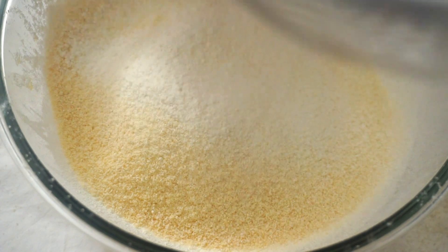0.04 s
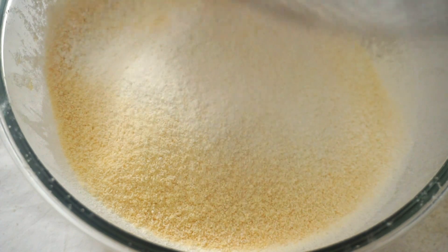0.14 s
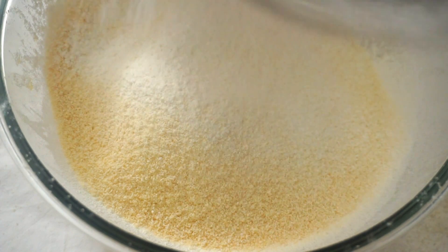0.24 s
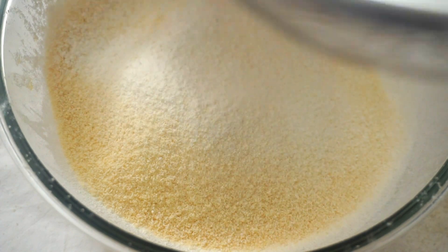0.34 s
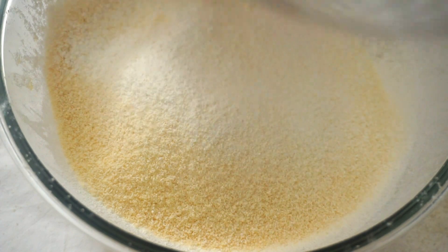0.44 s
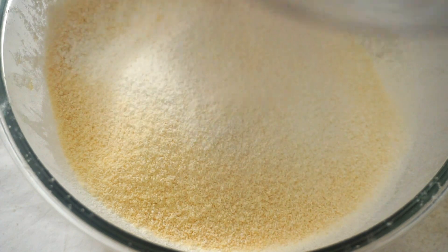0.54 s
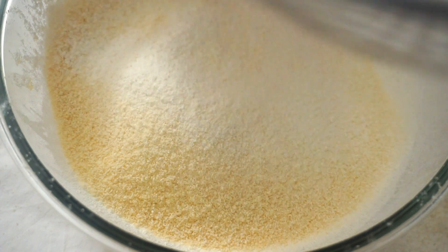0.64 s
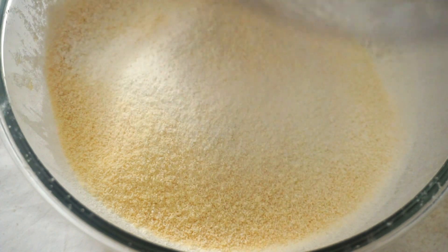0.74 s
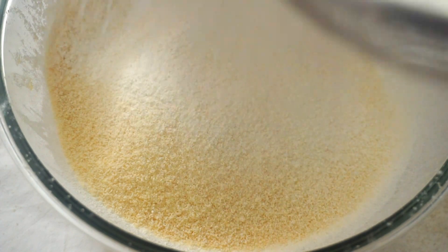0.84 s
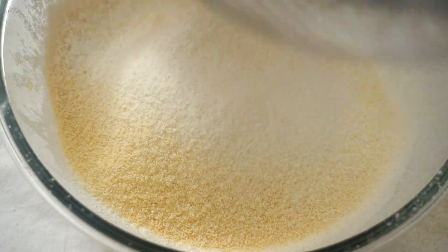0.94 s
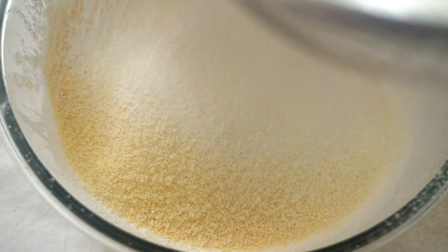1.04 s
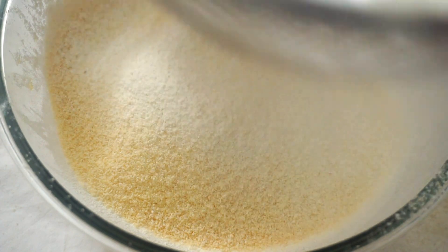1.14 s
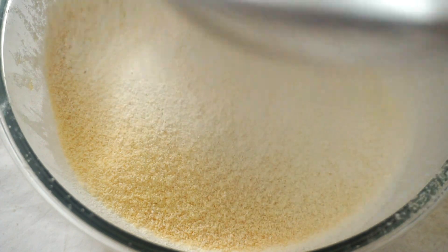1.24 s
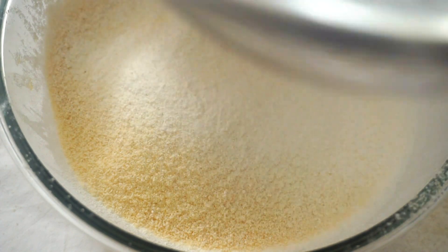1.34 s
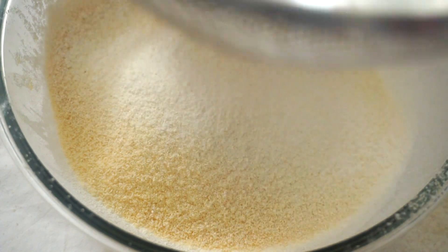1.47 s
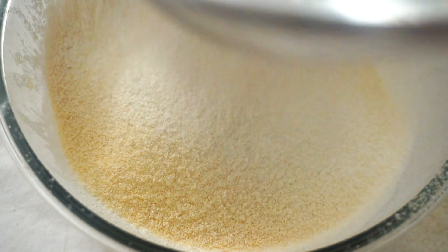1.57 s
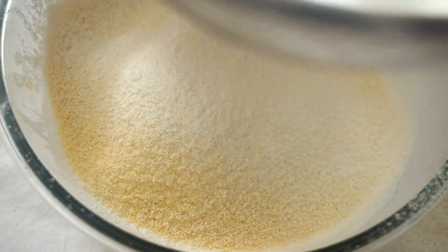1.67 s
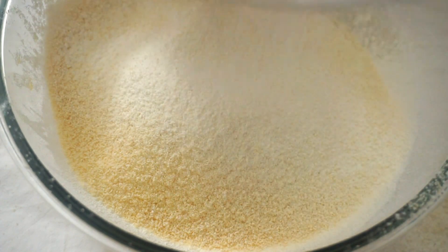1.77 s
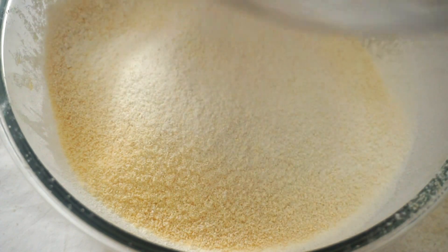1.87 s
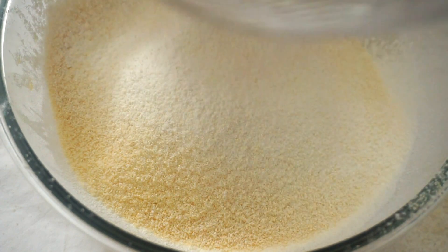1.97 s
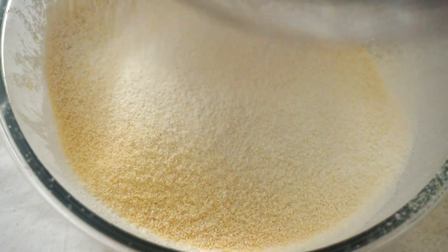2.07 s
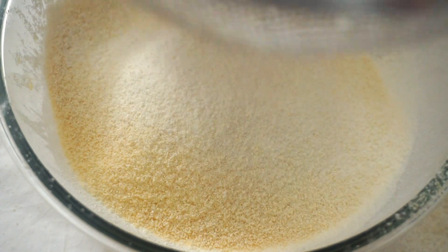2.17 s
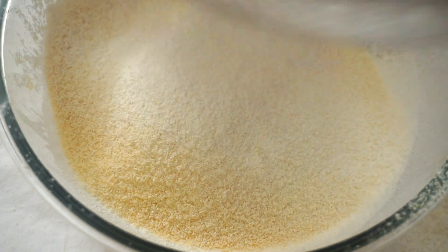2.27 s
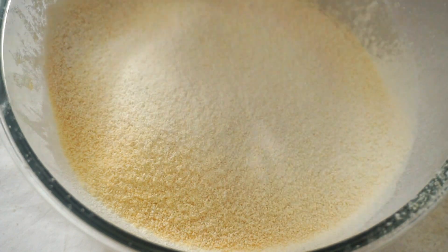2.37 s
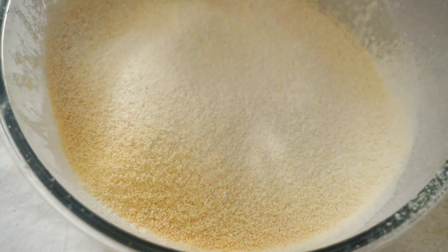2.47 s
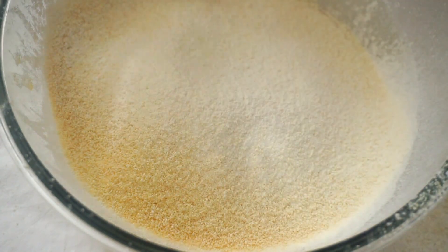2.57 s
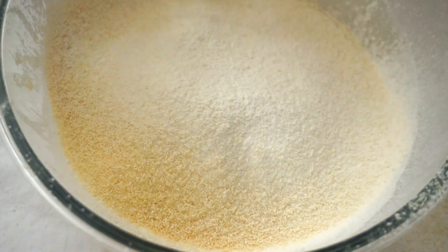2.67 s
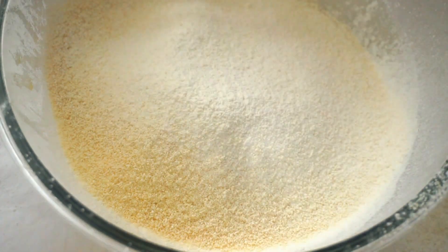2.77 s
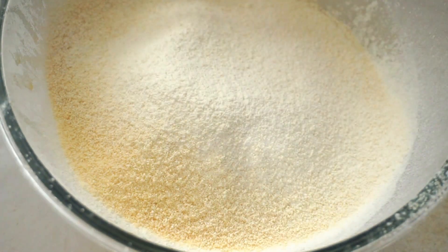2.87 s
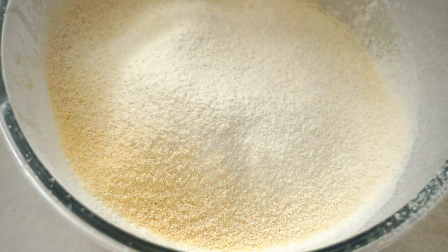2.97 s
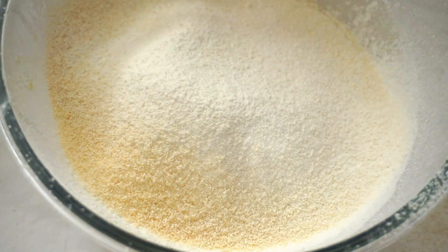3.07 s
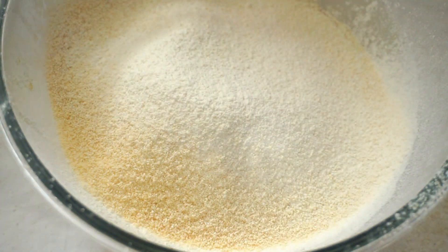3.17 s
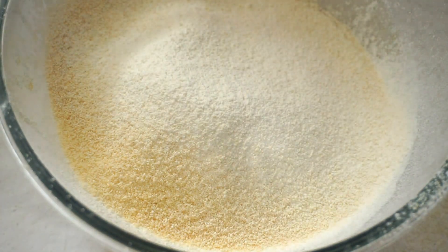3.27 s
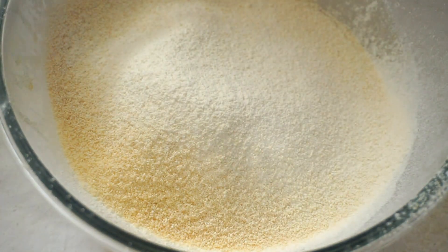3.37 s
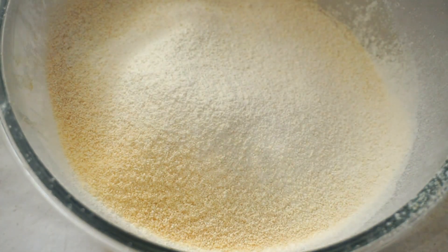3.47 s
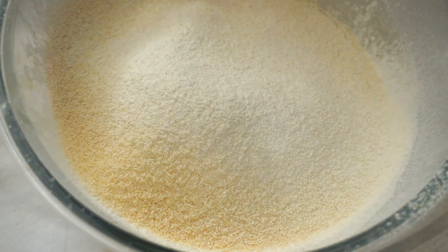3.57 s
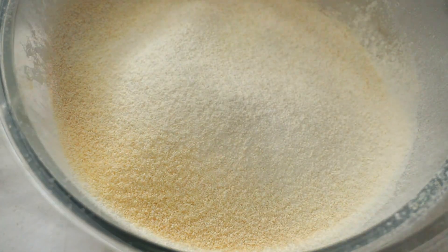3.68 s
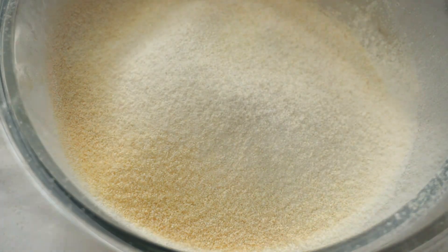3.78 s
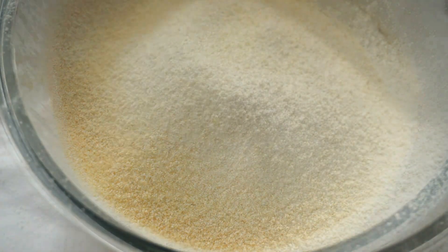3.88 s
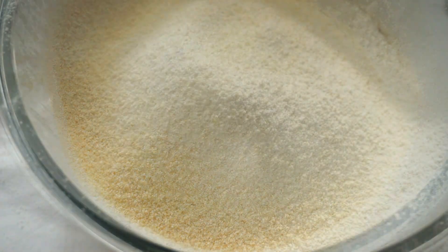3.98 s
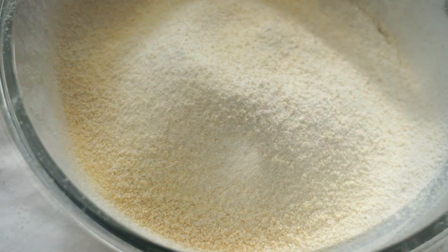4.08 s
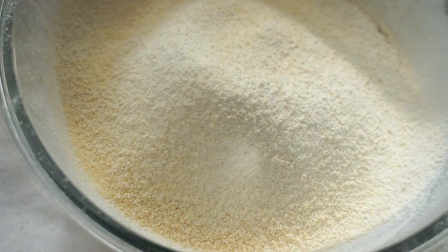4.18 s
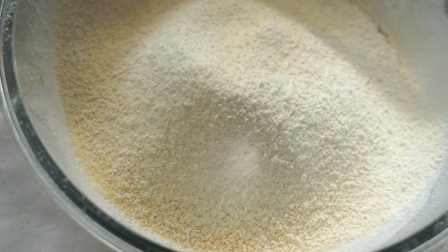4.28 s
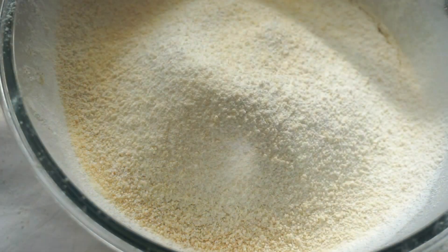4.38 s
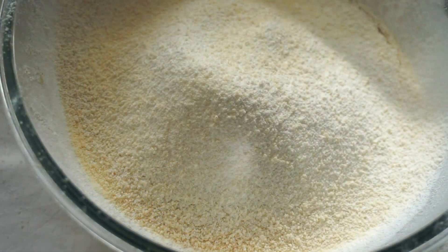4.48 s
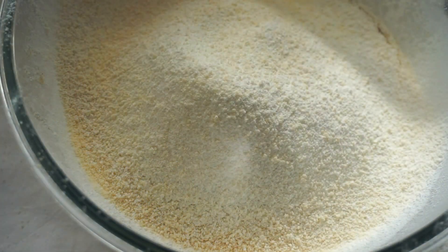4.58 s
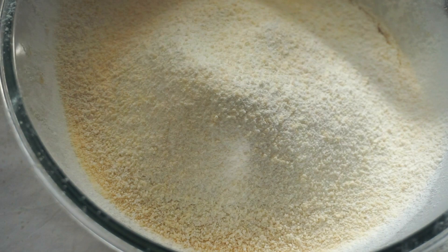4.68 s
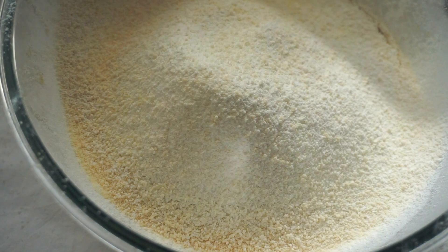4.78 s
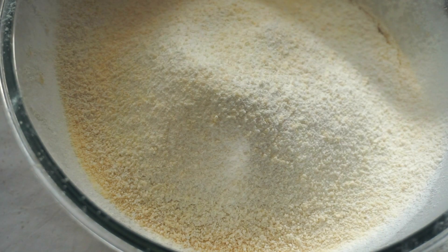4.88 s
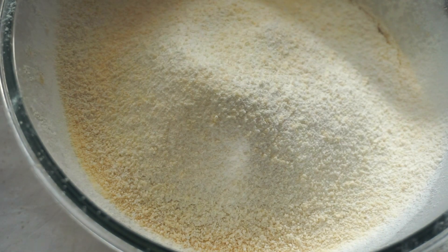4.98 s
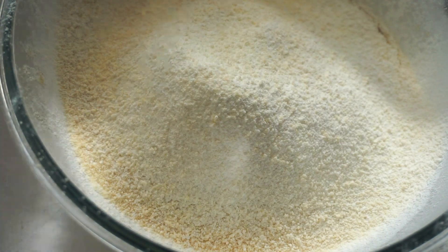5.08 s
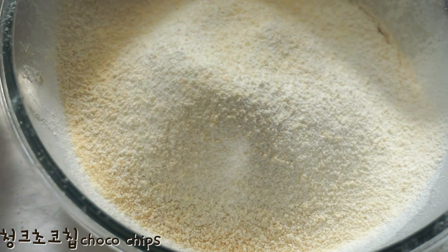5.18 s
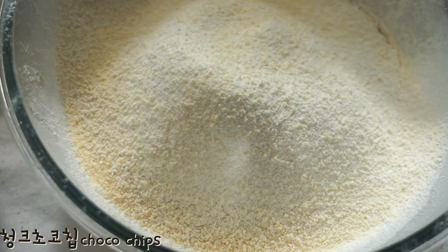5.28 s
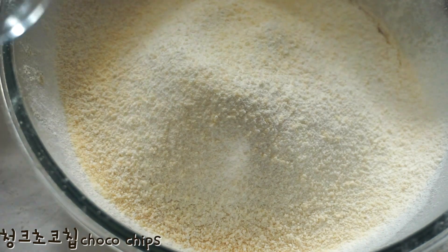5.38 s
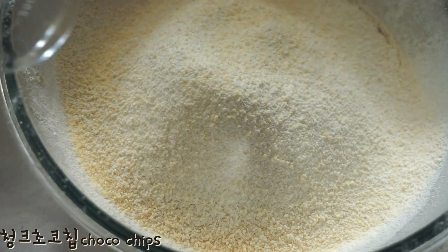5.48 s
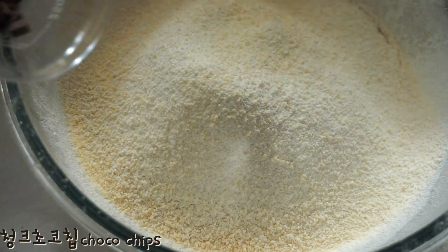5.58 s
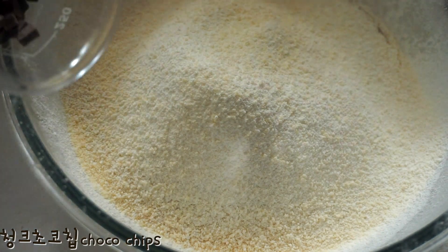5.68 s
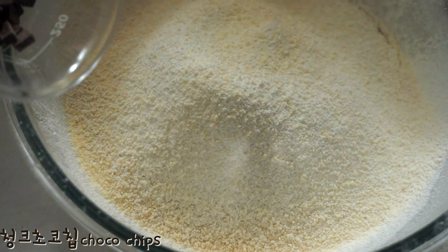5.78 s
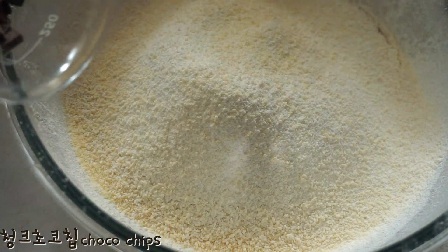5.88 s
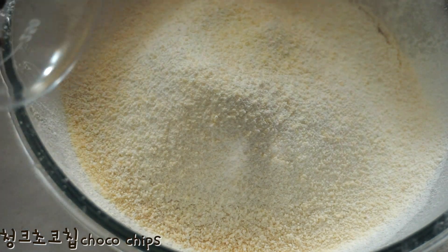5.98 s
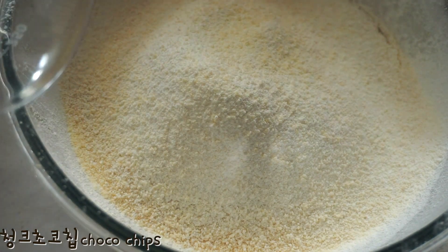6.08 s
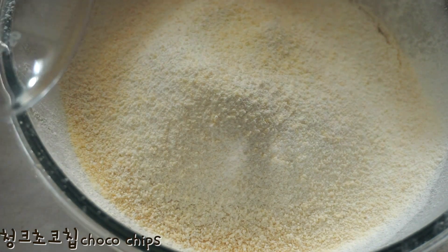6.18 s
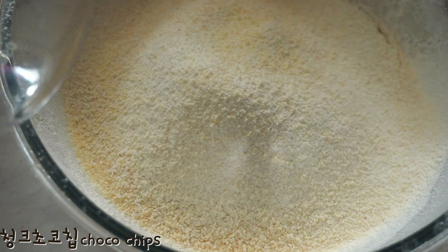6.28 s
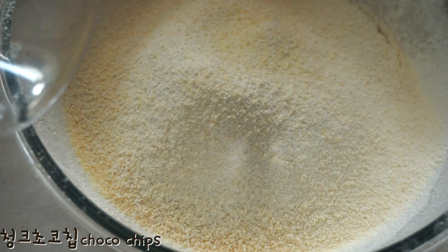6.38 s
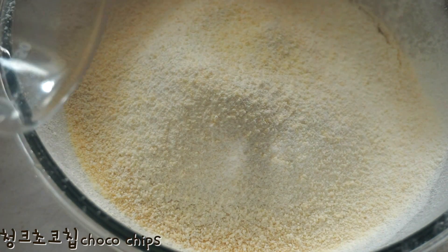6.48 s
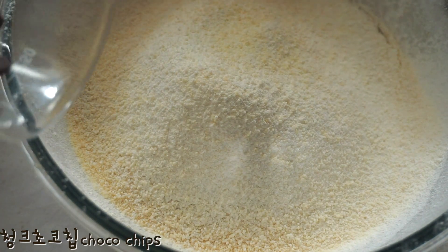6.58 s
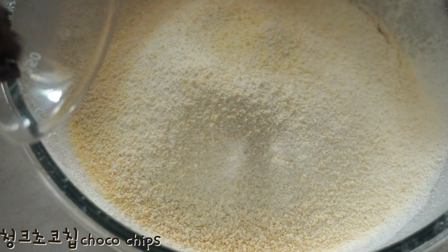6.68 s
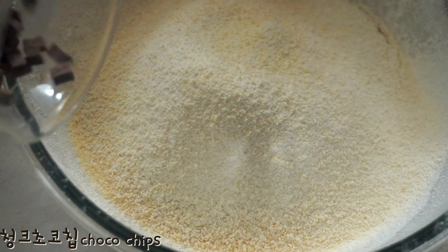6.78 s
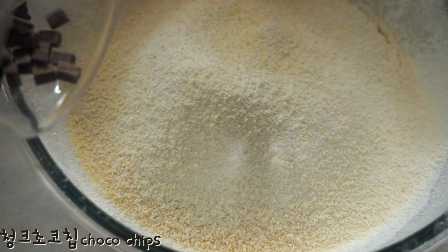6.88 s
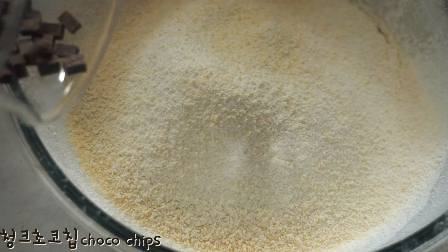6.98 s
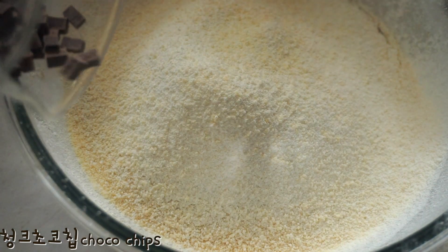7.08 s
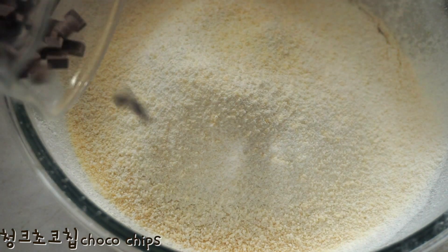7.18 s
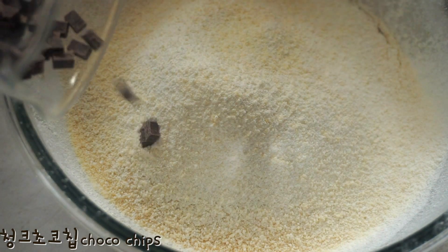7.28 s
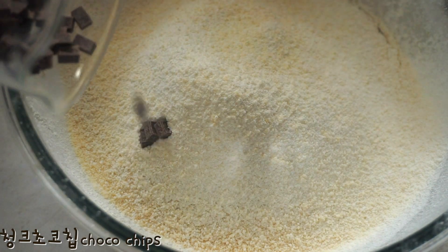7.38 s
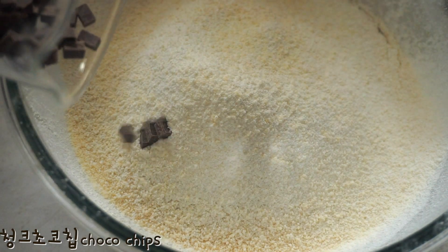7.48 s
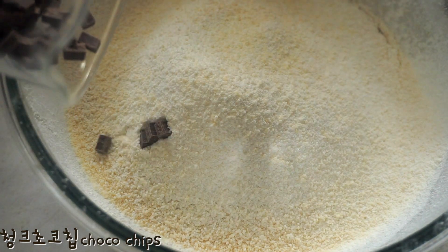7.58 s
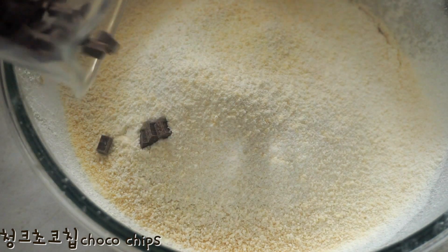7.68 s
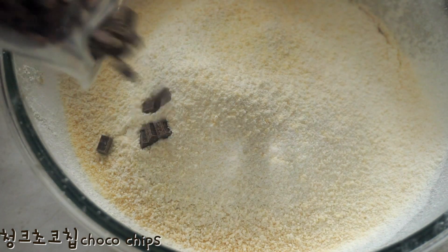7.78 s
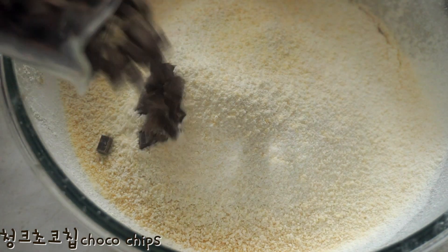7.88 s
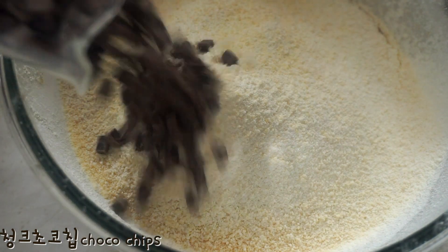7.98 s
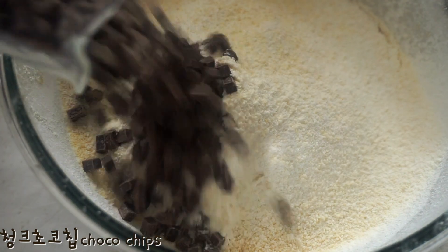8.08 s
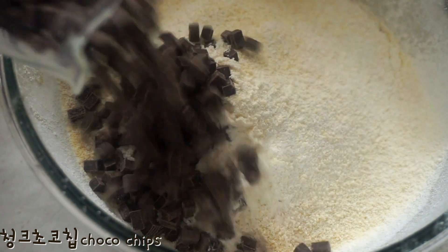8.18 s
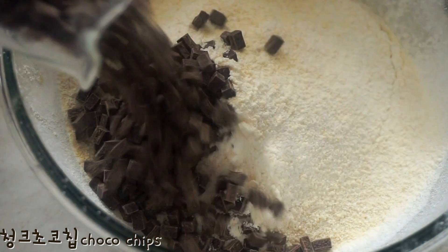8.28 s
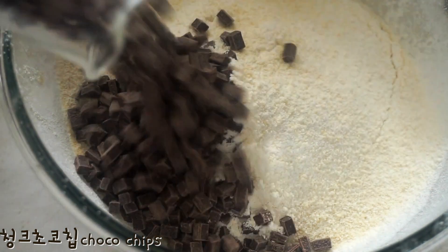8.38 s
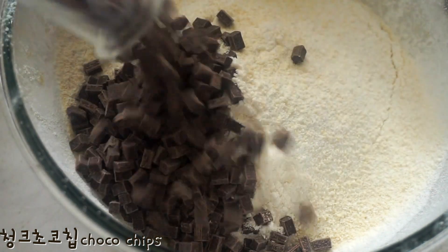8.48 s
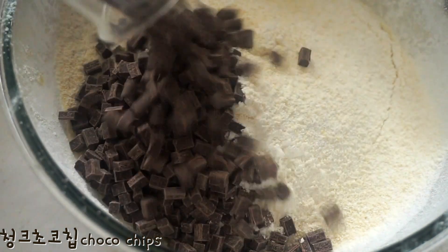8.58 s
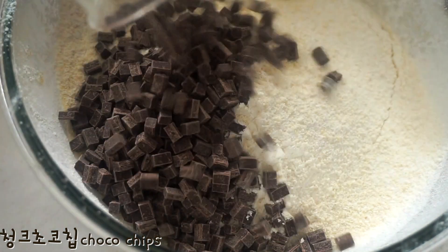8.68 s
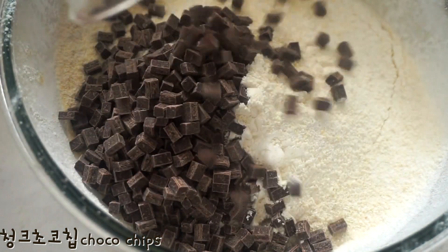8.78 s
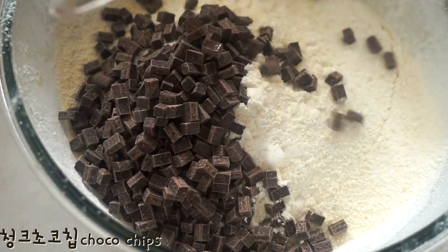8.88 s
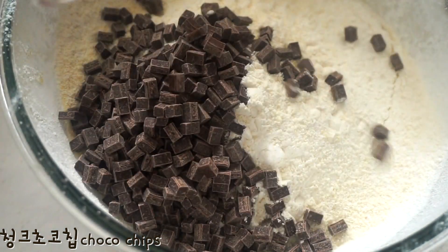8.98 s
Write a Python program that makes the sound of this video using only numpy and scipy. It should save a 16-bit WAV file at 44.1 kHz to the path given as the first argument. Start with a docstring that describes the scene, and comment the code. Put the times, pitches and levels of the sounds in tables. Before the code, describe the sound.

Rhythmic sieve taps with low thuds, a quiet rub of fingers on glass, then hard chunks jingling in a small cup and pattering onto flour.

```python
"""At a worktop, a hand taps a mesh sieve over a glass bowl of flour: gritty cracks, low thuds, swishing flour.
Then fingers rub a small glass cup of chocolate chunks, the chunks rattle in it, the bowl is knocked,
and the chunks pour out onto the flour. Glass and worktop are ringing tones set off by clicks;
flour, skin and sliding chunks are coloured noise. The worktop trembles below, with faint hiss throughout."""
import sys
import numpy as np
from scipy import signal
from scipy.fft import rfft, irfft, next_fast_len
from scipy.io import wavfile

SR = 44100
rng = np.random.default_rng(int(sys.argv[2]) if len(sys.argv) > 2 else 0)


def int16_out(signal):
    """Quantize to a 16-bit WAV file."""
    q = np.round(np.clip(np.atleast_2d(signal).T, -1, 1) * 32767)
    wavfile.write(sys.argv[1], SR, q.astype(np.int16))


N = 398663


def amp(db):
    """Turns decibels into a plain factor."""
    return 10 ** (np.asarray(db) / 20)


def rms_one(x):
    """Scales a signal to an average (rms) level of 1."""
    return x / np.sqrt(np.mean(x ** 2) + 1e-20)


def seconds():
    """The time of every sample."""
    return np.arange(N) / SR


def in_time(rows):
    """Draws each column as a line through time, very low outside the table."""
    start_s, *columns = np.transpose(rows)
    return [np.interp(seconds(), start_s, column, left=-120, right=-120) for column in columns]


def peaks_db(rows):
    """Levels that fall evenly in dB on both sides of each (s, dB, dB per s); the loudest counts."""
    t = seconds()
    return np.max([db - fall * np.abs(t - s) for s, db, fall in rows], axis=0)


def clicks(times, sizes):
    """Places single-sample clicks at the given times."""
    out = np.full(N, 1e-18)    # a tiny floor instead of exact silence
    where = np.minimum((np.asarray(times) * SR).astype(int), N - 1)
    np.add.at(out, where, sizes)
    return out


def ring(x, hz, t60):
    """A unit click sets a sine of height 1 ringing; it drops 60 dB in t60 seconds."""
    shrink = amp(-60 / (t60 * SR))
    turn = 2 * np.pi * hz / SR
    return signal.lfilter([0, np.sin(turn)], [1, -2 * shrink * np.cos(turn), shrink * shrink], x)


def soften(x, hz):
    """Two gentle low-pass filters in a row: a longer, softer contact."""
    r = np.exp(-2 * np.pi * hz / SR)
    return signal.lfilter([(1 - r) ** 2], [1, -2 * r, r * r], x)


def fade(x, t60):
    """Each click becomes a step that dies away by 60 dB in t60 seconds."""
    return signal.lfilter([1], [1, -amp(-60 / (t60 * SR))], x)


def colour(x, spectrum):
    """Filters x by a (Hz, dB) curve, then scales it to rms 1."""
    size = next_fast_len(N)
    hz, db = np.transpose(spectrum)
    bin_hz = np.arange(size // 2 + 1) * SR / size
    gain = amp(np.interp(np.log(bin_hz + 1), np.log(hz), db))
    return rms_one(irfft(rfft(x, size) * gain, size)[..., :N])


def noise(width):
    """Stereo noise, partly shared by both sides."""
    mid, side = rng.standard_normal((2, N))
    return np.array([mid + width * side, mid - width * side])


def grains(per_s, spread_db):
    """Random clicks of uneven size, pointing up or down."""
    sizes = amp(spread_db * np.minimum(rng.exponential(1, N), 5)) * rng.choice([-1, 1], N)
    return sizes * (rng.random(N) < per_s / SR)


def sides(pan_db):
    """Left and right factors; a positive pan_db leans left."""
    return amp(np.array([pan_db / 2, -pan_db / 2]))


def blow(s, db, light_hz, soft_hz):
    """One contact: soft ones lack treble, light ones lack bass."""
    push = soften(clicks([s], amp(db)), soft_hz)
    return push - soften(push, light_hz)


# Colour of the hiss: pitch_hz, relative_level_db
HISS_COLOUR = [(18, -40.5), (30, -10.5), (114, -14), (156, -11), (456, -17.5), (811, -21), (877, -23),
               (2030, -25.5), (2190, -29.5), (5920, -33.5), (15600, -37.5)]
HISS_DB = -54.5


def hiss():
    """Steady, wide noise that is strongest in the bass."""
    return amp(HISS_DB) * colour(noise(0.87), HISS_COLOUR)


# Low tones of the worktop: pitch_hz, undamped_t60_s, left_swing (factor), right_swing (factor)
# Opposite signs rock the worktop from side to side.
WORKTOP_TONES = [(33.5, 1, 1.43, 1), (54.5, 0.27, 0.24, 0.89), (80.8, 1, 0.64, -0.48),
                 (87.5, 0.42, 0.34, 0.38), (136, 0.14, 0.16, -0.45), (205, 0.082, 0.078, 0.15)]


def worktop(push, damping):
    """A push sets the worktop's low tones ringing; damping shortens them all."""
    return sum(ring(push, hz, t60 / damping) * [[left], [right]]
               for hz, t60, left, right in WORKTOP_TONES)


# The worktop trembles under the hands and the falling chunks: start_s, level_db
TREMBLE = [(0.0, -33), (0.3, -51), (0.93, -35.5), (1.3, -38.5), (1.81, -43.5), (2.15, -49), (3.1, -52),
           (3.78, -49.5), (3.96, -39.5), (4.5, -51), (4.88, -46), (5.44, -48.5), (5.78, -40), (6.02, -34.5),
           (6.49, -47), (7.1, -50.5), (7.4, -38.5), (7.7, -44.5), (8.06, -24.5), (8.41, -23.5), (8.6, -29),
           (9.04, -29.5)]
TREMBLE_LIGHT_HZ, TREMBLE_DAMPING = 43, 3.1   # small shakes move the lowest tone less


def trembling():
    """Random shaking with little deep bass keeps the worktop's tones rumbling."""
    shake = rng.standard_normal(N)
    light_shake = shake - soften(shake, TREMBLE_LIGHT_HZ)
    return amp(in_time(TREMBLE)[0]) * rms_one(worktop(light_shake, TREMBLE_DAMPING))


# The cup's blow reaches the worktop: start_s, strength_db, light_below_hz, soft_above_hz
WORKTOP_BUMP = [(5.620, -5, 85, 350)]


def worktop_bump():
    """One soft blow sets the worktop's low tones ringing."""
    return worktop(blow(*WORKTOP_BUMP[0]), damping=1.48)


# The microphone stand is nudged and sways: start_s, swing_db, pitch_hz, t60_s
STAND_SWAY = [(3.831, -29, 17, 0.39), (3.958, -22, 19.3, 1.2)]


def stand_sway():
    """Each nudge starts a very low swing that dies away."""
    return sum(ring(clicks([s], amp(db)), hz, t60) for s, db, hz, t60 in STAND_SWAY)


# Tones of the glass bowl: pitch_hz, relative_level_db, t60_s, left_right_db (positive is left)
BOWL_TONES = [(219, -11, 0.11, 7.5), (262, -7.5, 0.048, 8), (310.3, -30.5, 0.72, -28.5),
              (352, -2, 0.077, -3), (444.6, -6, 0.055, 9), (539, -27.5, 0.3, 5), (687, 1, 0.027, 2.5),
              (769, -9, 0.053, 6), (1328, -27, 0.37, 13), (1382, 0.5, 0.033, 3.5), (2420, -14, 0.248, 2),
              (3745, -15.5, 0.079, 4), (5330, -28, 0.056, -12), (7100, -25, 0.06, 4)]


def bowl_ring(push):
    """A push rings all tones of the bowl, each heard from its own side."""
    return sum(amp(db) * ring(push, hz, t60) * sides(pan_db)[:, None]
               for hz, db, t60, pan_db in BOWL_TONES)


# Blows on the bowl: start_s, strength_db, light_below_hz, soft_above_hz
BOWL_KNOCKS = [(5.619, -6.5, 15, 9000), (8.353, -10.5, 4500, 15000)]


def bowl():
    """The rim rings after each blow; being stiff, it takes up still less of a light blow's bass."""
    pushes = 0
    for s, db, light_hz, soft_hz in BOWL_KNOCKS:
        bass_cut = signal.butter(2, light_hz, "high", fs=SR, output="sos")
        pushes = pushes + signal.sosfilt(bass_cut, blow(s, db, light_hz, soft_hz))
    return bowl_ring(pushes)


# The stream of chunks landing on the flour: start_s, level_db
LANDING_STREAM = [(7.6, -66), (7.834, -47.5), (7.876, -36.5), (8.438, -34.5), (8.48, -38.5), (8.578, -32),
                  (8.74, -39), (8.78, -44), (8.81, -37.5), (8.86, -51), (8.885, -41), (8.93, -53),
                  (8.962, -36.5), (9.0, -59), (9.04, -70)]
# Lone chunks falling on the flour: peak_s, peak_level_db
LONE_DROPS = [(7.15, -50.5), (7.26, -50), (7.33, -53.5), (7.429, -47.5)]
DROP_FALL_DB_PER_S = 352
# Colour of the patter: pitch_hz, relative_level_db
HEAP_COLOUR = [(70, -34), (130, -12), (210, -7), (400, -15), (590, -0.5), (1050, -11), (2000, -13.5),
               (4000, -11.5), (9000, -18.5)]


def heap():
    """Chunks patter on the flour as uneven bursts of noise, and jog the bowl into ringing."""
    drops = [(s, db, DROP_FALL_DB_PER_S) for s, db in LONE_DROPS]
    level_db = np.maximum(in_time(LANDING_STREAM)[0], peaks_db(drops))
    patter = (0.74 + fade(np.abs(grains(500, 2.54)), 0.0042)) * noise(0.097)
    jogged_bowl = amp(-8.5) * rms_one(bowl_ring(patter[0]))
    return amp(level_db) * (colour(patter, HEAP_COLOUR) + jogged_bowl)


# Hand against the sieve rim, all levels relative: start_s, crack_db, thud_db,
# swing_db (flour sliding on the swing towards the hand), throw_db (flour thrown after the tap),
# frame_db (frame creaking)
SIEVE_TAPS = [(-0.03, -60, -60, -70, -48, -62), (0.124, -31.5, -23.5, -64, -50, -57),
              (0.2803, -31.5, -27.5, -65, -50, -55.5), (0.43, -38, -37, -65, -53.5, -54.5),
              (0.57, -34, -35.5, -67, -52, -53), (0.7354, -21.5, -20, -60.5, -47.5, -52),
              (0.9214, -22, -20, -53, -47.5, -55), (1.103, -18.5, -18, -42, -46.5, -53),
              (1.2736, -23.5, -24, -44.5, -46.5, -52.5), (1.435, -21, -24.5, -60, -48, -51),
              (1.61, -25, -31, -61, -51.5, -56), (1.7825, -18.5, -21.5, -61, -49, -54),
              (1.9498, -18.5, -21.5, -63, -47.5, -57), (2.117, -19.5, -24, -64, -48, -58),
              (2.29, -60, -45, -65, -69, -58)]
# Colour of the crack: pitch_hz, relative_level_db
CRACK_COLOUR = [(88, 5), (150, -2), (275, -3.5), (578, -8.5), (2360, -15), (3840, -7), (5680, -6.5),
                (6390, -5.5), (7470, -14.5), (12700, -16), (16000, -23)]
# Colour of the moving flour: pitch_hz, relative_level_db
FLOUR_COLOUR = [(530, 2.5), (900, -9.5), (1450, -4), (2700, -6.5), (3230, -5.5), (5460, -4), (7440, -9),
                (11700, -10.5), (15600, -19)]
# Tones of the creaking frame: pitch_hz, relative_level_db, t60_s
FRAME_TONES = [(314, -6.5, 0.095), (406, -1, 0.021), (615, 1.5, 0.02), (716, 1.5, 0.036)]
SWING_LEAD_S, SWING_WIDTH_S = 0.043, 0.032   # the swing peaks before the tap
THROW_LAG_S, THROW_WIDTH_S = 0.029, 0.04     # the throw peaks after it
CRACK_TIME_S = 0.012                         # time scale of every crack
FIRM_DB, FIRM_PAN_DB, LEFTWARD_PER_DB = -18, 0.8, 0.15   # softer taps lie further left


def sieve():
    """Each tap is a gritty crack and a damped thud; flour swishes and the frame creaks before and after."""
    t = seconds()
    grit = 1 + .5 * fade(np.abs(grains(200, 4.0)), .004)
    flour = colour(noise(.35) * grit, FLOUR_COLOUR)
    creak = noise(0.28)
    frame = rms_one(sum(amp(db) * ring(creak, hz, t60) for hz, db, t60 in FRAME_TONES))
    crack_gain = np.zeros((2, N))
    flour_gain, frame_gain = np.zeros((2, N))
    for s, crack_db, _, swing_db, throw_db, frame_db in SIEVE_TAPS:
        age = np.clip((t - s) / CRACK_TIME_S, 0, 9)
        crack_shape = 2.35 * age * np.exp(-6.0 * age ** 2) + 0.9 * age * np.exp(-3.0 * age)
        pan_db = FIRM_PAN_DB + LEFTWARD_PER_DB * (FIRM_DB - crack_db)
        crack_gain += amp(crack_db) * sides(pan_db)[:, None] * crack_shape
        swing = np.exp(-((t - s + SWING_LEAD_S) / SWING_WIDTH_S) ** 2)
        throw = np.exp(-((t - s - THROW_LAG_S) / THROW_WIDTH_S) ** 2)
        flour_gain += amp(swing_db) * swing + amp(throw_db) * throw
        frame_gain += amp(frame_db) * (0.51 * swing + throw)
    tap_s, thud_db = np.transpose(SIEVE_TAPS)[[0, 2]]
    thud_push = soften(clicks(np.maximum(tap_s, 0) + 0.0031, amp(thud_db)), 150)
    thuds = worktop(thud_push, damping=5.3)
    cracks = crack_gain * colour(noise(0.25), CRACK_COLOUR)
    return cracks + flour_gain * flour + frame_gain * frame + thuds


# Strokes of skin on glass: peak_s, peak_level_db, fall_db_per_s (on either side)
SKIN_STROKES = [(3.05, -66, 60), (3.38, -62.5, 90), (4.108, -43, 168), (4.382, -39, 248),
                (4.554, -47.5, 150), (4.666, -33.5, 400), (4.776, -31, 415), (4.83, -40, 170)]
# Colour of skin on glass: pitch_hz, relative_level_db
SKIN_COLOUR = [(350, -10), (600, -4), (1600, -10.5), (2250, -10.5), (3080, -4), (4900, -1), (5850, -0.5),
               (7080, -1.5), (12400, 1.5), (15600, -4)]
# Small ticks, and at the end a ping of the glass cup: start_s, ring_level_db, pitch_hz, t60_s
TICKS_AND_PING = [(3.638, -49, 3500, .003), (3.664, -28, 7080, 0.0014), (3.81, -48, 9040, 0.0028),
                  (4.492, -32, 850, 0.0065), (4.669, -23.5, 5770, 0.0083), (5.144, -34.5, 3520, 0.0053),
                  (5.818, -41, 900, 0.027), (5.873, -44, 3500, 0.0027), (8.827, -30, 3160, 0.088)]
# fingers rest on the cup and creep, then the sound falls away
HOLD_START_S, HOLD_END_S, HOLD_DB, HOLD_FALL_DB_PER_S = 3.955, 4.99, -54, 117


def fingers():
    """Rubbing is noise with fine stick-slip grit; small ticks and a last ping of the cup are edged rings."""
    t = seconds()
    after_hold_s = np.maximum(t - HOLD_END_S, 0)
    hold_db = np.where(t < HOLD_START_S, -120, HOLD_DB - HOLD_FALL_DB_PER_S * after_hold_s)
    grit = noise(.35) * (1 + .3 * rms_one(soften(np.abs(grains(300, 3.0)), 400)))
    rubbing = amp(np.maximum(peaks_db(SKIN_STROKES), hold_db)) * colour(grit, SKIN_COLOUR)
    rings = sum(ring(clicks([s], amp(db)), hz, t60) for s, db, hz, t60 in TICKS_AND_PING)
    edge_clicks = sum(clicks([s], amp(db - 5)) for s, db, _, _ in TICKS_AND_PING)
    edges = fade(edge_clicks, 0.0082) * colour(noise(0.59), SKIN_COLOUR)    # short bursts of noise
    return rubbing + rings + edges


# The mass of chunks, in two spells, levels relative:
# start_s, sliding_db (over each other), wall_db (pressing on the wall of the cup)
CHUNK_MASS = [
    [(5.0, -60, -70), (5.29, -61.5, -68), (5.366, -44, -43), (5.456, -31, -33), (5.5, -36, -30),
     (5.62, -47.5, -45)],
    [(6.4, -77, -79), (6.53, -58, -47), (6.74, -57, -47), (7.32, -69, -57.5), (7.46, -69, -80),
     (7.68, -67, -69), (7.74, -54, -41.5), (7.83, -44, -42), (7.96, -31, -25), (8.04, -26.5, -21),
     (8.21, -31, -29.5), (8.53, -29.5, -44), (8.79, -39, -48), (8.93, -73, -66), (9.04, -57, -65)],
]
# smaller strikes: the click follows the press on the wall, the rings follow the click
SMALL_DB, SMALL_SPREAD_DB, SMALL_OTHER_DB, SMALL_LOW_DB = -1, 4, -14, -26.5


def small_strikes(wall_db, count):
    """Rows like those of the loud strikes, at random moments."""
    s = rng.uniform(CHUNK_MASS[0][0][0], N / SR, count)
    luck = rng.normal(0, 1, (count, 4))
    click_db = wall_db[(s * SR).astype(int)] + SMALL_DB + SMALL_SPREAD_DB * luck[:, 0]
    other_db = SMALL_OTHER_DB + SMALL_SPREAD_DB * luck[:, 1]
    low_db = click_db[:, None] + SMALL_LOW_DB + SMALL_SPREAD_DB * luck[:, 2:]
    return np.column_stack([s, click_db, other_db, low_db])


# Tones of the glass cup: the lowest, three near 3.2-3.7 kHz, and the others:
# pitch_hz, relative_level_db, undamped_t60_s
LOWEST_TONES = [(1329, 0.0024, 0.16)]
MIDDLE_TONES = [(3210, -13, 0.16), (3606, -1.5, 0.096), (3650, -7.5, 0.25)]
OTHER_TONES = [(1890, -21.5, 0.11), (2760, -28.5, 0.071), (5000, -19.5, 0.0067), (5700, -9, 0.011),
               (6315, -12, 0.077), (6520, -5.5, 0.062), (7650, -6.5, 0.021), (8280, -9, 0.081),
               (9160, -5, 0.024), (10040, -2.5, 0.047), (10560, -7, 0.028), (11470, -3, 0.041),
               (12300, -24.5, .025), (13500, -10.5, .02)]
# Chunks lying in the cup damp it until it is empty: start_s, end_s, damping (divides t60; 1 = free)
CUP_LOAD = [(5.0, 6.2, 3.2), (6.202, 8.45, 5.0), (8.45, 8.82, 2.2), (8.82, 9.04, 0.88)]


def cup_rings(strikes, crowd):
    """Each strike pushes every tone with its own strength; the crowd of chunks also stirs them."""
    s, click_db, other_db, middle_db, lowest_db = strikes.T
    tones = [(tone, lowest_db) for tone in LOWEST_TONES]
    tones += [(tone, middle_db) for tone in MIDDLE_TONES]
    tones += [(tone, click_db + other_db) for tone in OTHER_TONES]
    luck, place = rng.normal(0, 1, (2, len(s), len(tones)))
    out = np.zeros((2, N))
    for k, ((hz, db, t60), strike_db) in enumerate(tones):
        # each strike gets a random sign and a random side for every tone
        size = amp(strike_db + db + 1.1 * luck[:, k]) * np.sign(place[:, k])
        push = np.array([clicks(s, size * side) for side in sides(1.9 + 4.4 * place[:, k])])
        # crumbs are too light to move the low tones much
        push += amp(db) * min(hz / 7000, 1) ** 2 * crowd
        for start_s, end_s, damping in CUP_LOAD:
            span = slice(int(start_s * SR), int(end_s * SR))
            out[:, span] += ring(push[:, span], hz, t60 / damping)
    return out


AIR_HZ, AIR_T60_S = 862, 0.033
AIR_DB, AIR_FOLLOWS = -32, 0.46   # added to this share of the wall press in dB


def cup_air(clumps, wall_db):
    """The air in the cup hums at one pitch, stirred by clumpy noise."""
    stir = clumps * (0.68 + fade(np.abs(grains(120, 1.5)), 0.03)) * noise(0.24)
    return amp(AIR_DB + AIR_FOLLOWS * wall_db) * rms_one(ring(stir, AIR_HZ, AIR_T60_S))


# Colour of chunks sliding on chunks: pitch_hz, relative_level_db
SCRAPE_COLOUR = [(530, -33.5), (900, -14.5), (1290, 1), (2220, -9.5), (2470, -19), (5820, -0.5),
                 (6410, -1.5), (7140, -0.5), (11600, 5), (16000, -1.5)]


def chunk_sliding(jostle, sliding_db):
    """Scraping noise whose colour drifts at random between dull and bright."""
    scrape = colour(jostle, SCRAPE_COLOUR)
    dull = soften(scrape, 5000)
    drift = amp(2.0 * rms_one(soften(rng.standard_normal(N), 20)))
    return amp(sliding_db) * (dull * drift + (scrape - dull) / drift)


# Colour of the dry click: pitch_hz, relative_level_db
CLICK_COLOUR = [(290, -46), (500, -16), (3060, -8.5), (3590, -5.5), (4800, -7.5), (6420, -2.5),
                (7640, -14.5), (11500, -0.5), (16000, -26.5)]


def chunk_clicks(s, click_db):
    """A short burst of noise with a long, weak scatter of smaller contacts."""
    snap = clicks(s, amp(click_db))
    short = soften(fade(snap, 0.0033), 1300)
    scatter = amp(-21.0) * fade(snap, 0.093)
    return (short + scatter) * colour(noise(0.34), CLICK_COLOUR)


# The loudest chunks striking the cup, levels relative: start_s, click_db,
# other_rings_db (against the click), middle_ring_db, lowest_ring_db
LOUD_STRIKES = [(5.3185, -27.5, 0, -34, -48), (5.3304, -29, -7, -33, -43), (5.3453, -26.5, -0.5, -49, -60),
                (5.3574, -15, -16, -21, -34), (5.383, -35, -3, -31, -44), (5.389, -16, 2.5, -32, -36.5),
                (5.3992, -27, 5, -27, -43), (5.414, -17, 5, -32, -47), (5.4227, -20, 5, -43, -34),
                (5.435, -24, 3, -33, -54), (5.4512, -16, 4, -38, -32), (5.46, -17.5, 3, -25, -28.5),
                (5.469, -16, 2, -44, -29), (5.4863, -20, 2, -34, -55), (5.493, -21, -9, -51, -38),
                (5.502, -16.5, 2.5, -39, -30), (5.5132, -19, 1, -47.5, -50.5), (5.5266, -23, -1, -41, -31),
                (5.5403, -20, 0.5, -56, -51), (5.5792, -27, -3, -47, -50), (5.5841, -26, -5, -60, -63),
                (5.609, -30, -5, -60, -50), (5.7417, -27.5, -22, -75, -57),
                (6.4829, -34.5, -13, -44.5, -52), (6.544, -28, -22, -60, -48),
                (6.6625, -33.5, -13, -57, -54), (6.6858, -30, -16, -47, -35), (6.711, -25, -8, -40, -66),
                (6.7204, -23.5, -2, -34, -60), (6.7288, -20, -9, -62, -67), (6.7409, -24, -17, -32, -35),
                (6.7574, -11, -15, -28, -33.5), (6.786, -16, -0.5, -29, -32), (6.7919, -19, 1, -55, -59),
                (6.8098, -17.5, -7, -55, -60), (6.8187, -23, -8, -62, -33), (6.832, -16, -16, -47, -37),
                (6.8383, -22.5, 3, -59, -49), (6.8578, -25, -16, -66, -60), (6.8808, -31, -4, -35, -35),
                (6.9058, -17.5, 1.5, -61, -47), (6.9147, -21.5, -6, -62, -50), (6.93, -27, 0, -66, -61),
                (7.0046, -11, -3, -47, -58), (7.0146, -26, -20, -59, -66), (7.0461, -28, -14, -61, -70),
                (7.0695, -13.5, -17, -55, -48), (7.095, -31, -17, -69, -41), (7.1258, -23.5, -20, -62, -43),
                (7.1563, -20, -5, -47, -38), (7.1617, -21, -10, -63, -67), (7.2087, -28, -17, -70, -40),
                (7.2215, -22, -6, -59, -70), (7.2335, -20.5, -4, -49, -57), (7.2473, -20.5, -0.5, -54, -37),
                (7.2531, -19.5, -6, -60, -35), (7.2852, -24, -12, -69, -44), (7.3273, -33, -15, -70, -44),
                (7.357, -21.5, -4, -59, -42), (7.3967, -23, -2.5, -65, -53), (7.4158, -32, -3, -59, -61),
                (7.4326, -18.5, -16, -69, -32.5), (7.4793, -33, 4, -74, -72), (7.6213, -37, -9, -70, -66),
                (7.629, -35.5, 0, -70, -70), (7.6956, -26, -5.5, -46, -55), (7.732, -27.5, -5, -60, -53),
                (7.7623, -26.5, -2, -60, -60), (7.787, -26, -9.5, -69, -57), (7.8195, -19, -11, -58, -66),
                (7.8676, -15, -12, -44, -24.5), (7.8723, -16, -20, -57, -45), (7.8792, -13, -14, -49, -53),
                (7.892, -9.5, -3.5, -52, -37), (7.9767, -13.5, -1.5, -51, -53), (7.97, -20, 1, -51, -43),
                (8.026, -24, -15, -51, -46), (8.0703, -21, -6, -45, -38), (8.3151, -24, 1, -44, -46),
                (8.5771, -24, -6, -50, -40), (8.1875, -18, -22, -50, -57), (8.2557, -16.5, 0.5, -45, -39),
                (8.4191, -14.5, -1.5, -49, -57), (8.5187, -15, 1.5, -31, -48), (8.6, -14.5, -1, -48, -57),
                (8.6349, -22, 4, -52, -58), (8.6516, -21, 4.5, -54, -54), (8.7086, -26, -4, -51, -48.5),
                (8.7257, -20.5, -0.5, -46, -55), (8.7766, -26, -14, -66, -56), (8.7914, -26, -11, -48, -53),
                (8.8249, -20, -1, -40, -43), (8.828, -15.5, -10, -52, -54), (8.8676, -23, -12, -61, -55),
                (8.8779, -18.5, -2, -28, -33), (8.9027, -20.5, -3, -47, -62),
                (8.9394, -19.5, -9.5, -37.5, -39), (8.9582, -26, -4.5, -51, -46),
                (9.0101, -34, -13, -58, -68)]


def cup():
    """Chunks strike, slide and press in the glass cup: clicks, scraping, ringing tones and humming air."""
    sliding_db, wall_db = (np.maximum(*pair) for pair in zip(*map(in_time, CHUNK_MASS)))
    strikes = np.vstack([LOUD_STRIKES, small_strikes(wall_db, count=240)])
    clumps = amp(2.0 * rms_one(soften(rng.standard_normal(N), 40)))   # slow, uneven swelling
    jostle = clumps * (.55 + fade(np.abs(grains(600, 3.1)), 0.0068)) * noise(.3)
    crowd = amp(wall_db - 24.5) * rms_one(jostle)
    out = chunk_sliding(jostle, sliding_db)
    out += chunk_clicks(strikes[:, 0], strikes[:, 1])
    out += cup_rings(strikes, crowd)
    return out + cup_air(clumps, wall_db)


def scene():
    """All sources together, from the background to the cup."""
    background = hiss() + trembling() + worktop_bump() + stand_sway()
    return background + bowl() + heap() + sieve() + fingers() + cup()


APART_HZ, APART_DB = 10000, -3.5   # the microphones point apart: more side sound in the treble
CUTOFF_HZ = 16800


def record(dry):
    """The treble is widened, the loudest peaks are rounded off near full scale, the top is cut."""
    treble = signal.butter(2, APART_HZ, "high", fs=SR, output="sos")
    side = signal.sosfilt(treble, dry[0] - dry[1])
    wide = dry + amp(APART_DB) * side / 2 * [[1], [-1]]
    rounded = wide / (1 + wide ** 6) ** (1 / 6)
    top_cut = signal.cheby2(12, 70, CUTOFF_HZ, fs=SR, output="sos")
    return signal.sosfilt(top_cut, rounded)


dry = scene()
out = record(dry)
int16_out(out)
```